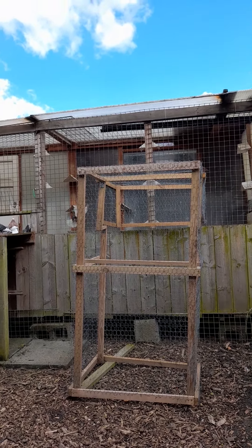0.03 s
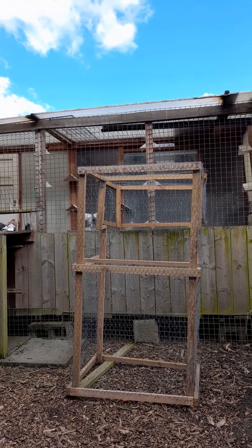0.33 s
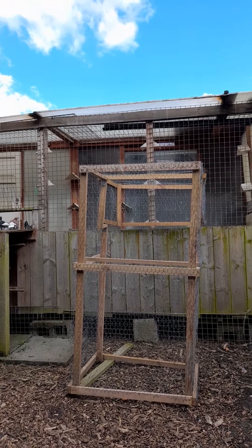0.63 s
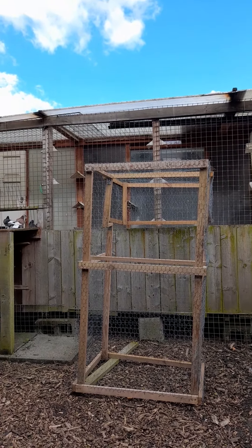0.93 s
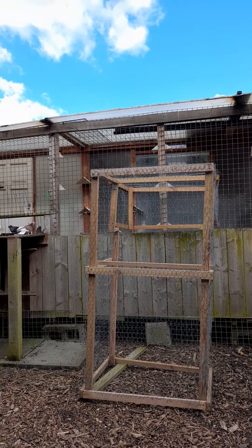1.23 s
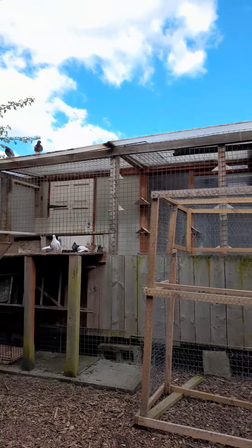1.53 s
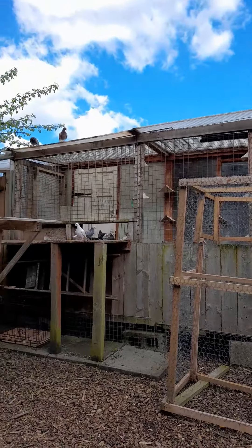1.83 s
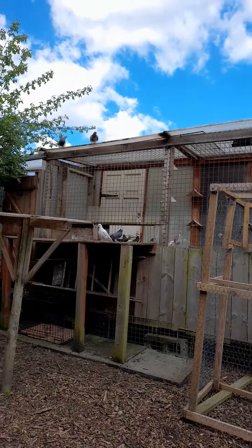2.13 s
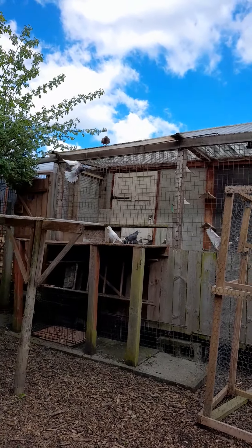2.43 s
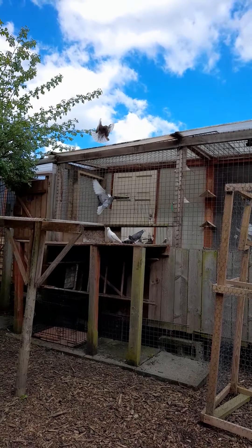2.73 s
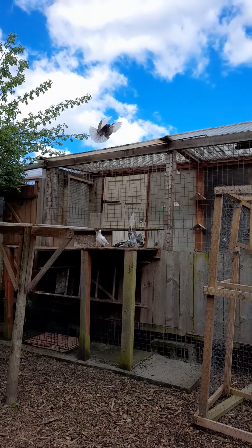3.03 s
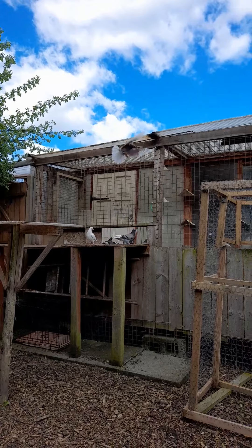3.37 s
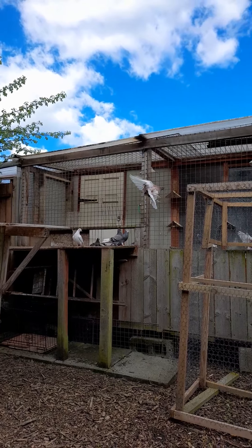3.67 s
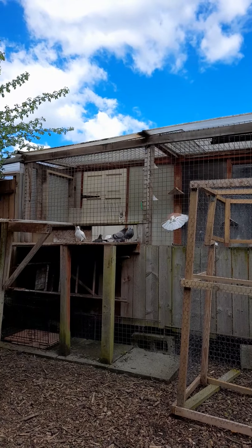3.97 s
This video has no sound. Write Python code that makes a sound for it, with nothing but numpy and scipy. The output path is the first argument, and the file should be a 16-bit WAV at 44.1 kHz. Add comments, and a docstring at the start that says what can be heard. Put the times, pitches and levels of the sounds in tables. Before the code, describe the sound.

Dry feed shaken rhythmically in a plastic tub, then faint bird chirps and pigeon wing flaps.

```python
"""Dry feed shaken ten times in a plastic tub, close to the right of the microphone, in a backyard.
On each stroke the grain slams into the wall, rings the tub, slides on and rolls back; then it settles.
Pigeons flap with whistling feathers and coo about their loft, and a small songbird twitters
in gliding whistles and rasps over the quiet outdoor air."""
import sys
import numpy as np
from scipy import signal
from scipy.fft import rfft, irfft
from scipy.io import wavfile
from scipy.ndimage import uniform_filter1d

SR = 44100
rng = np.random.default_rng(int(sys.argv[2]) if len(sys.argv) > 2 else 0)


def materialize(psi):
    """Save the field psi as 16-bit PCM at rate SR to the path in sys.argv[1].

    A 1-D psi becomes a single channel; in a 2-D psi each row is a channel.
    """
    bounded = np.clip(np.atleast_2d(psi).T, -1, 1)
    quanta = np.round(bounded * 32767).astype(np.int16)
    wavfile.write(sys.argv[1], SR, quanta)


N = 176400
T = np.arange(N) / SR
HZ = np.fft.rfftfreq(N, 1 / SR)
GRAINS_PER_S = 16000

# Strokes of the tub, relative levels:
# impact/s, rise/s, fall/s, slam/dB, thud/dB, clack/dB, slide/dB, slide length/s, thud centre/Hz
STROKES = [(.046, 0.0088, 0.022, -12, -2, -3, -23.5, 0.13, 470),
           (.289, 0.0076, 0.02, -12, -5.5, -2, -32, 0.21, 443),
           (0.552, 0.014, 0.0093, -12, 0, 2.5, -22, 0.085, 440),
           (.785, 0.011, 0.013, -13, 0.5, -1, -24.5, 0.069, 422),
           (1.034, 0.0074, 0.012, -9.5, 2.5, 2.5, -21.5, 0.13, 573),
           (1.286, 0.012, 0.01, -11, 0.5, 4.5, -21.5, 0.13, 490),
           (1.552, 0.017, 0.0054, -11.5, -0.5, 0.5, -25, 0.068, 527),
           (1.824, 0.016, 0.012, -12.5, -3.5, -1, -23.5, 0.13, 458),
           (2.095, .015, 0.013, -11.5, -4, -1.5, -28.5, 0.12, 486),
           (2.364, 0.016, 0.0025, -14, -3.5, 2, -27.5, 0.071, 420)]


def amp(db):
    """Decibels to gain."""
    return 10 ** (np.asarray(db) / 20)


def unit(x):
    """Scale to rms 1."""
    return x / np.sqrt(np.mean(x ** 2) + 1e-20)


def read(points, hz=HZ):
    """Interpolate a table over log frequency."""
    f, value = np.transpose(points)
    return np.interp(np.log(hz + 1), np.log(f + 1), value)


def swell(s, sigma_s):
    """Gaussian envelope centred on s."""
    return np.exp(-.5 * np.minimum(((T - s) / sigma_s) ** 2, 200))


def convolve(x, response):
    """Apply an impulse response."""
    return signal.fftconvolve(np.atleast_2d(x), np.atleast_2d(response), axes=1)[:, :N]


def causal(gain, size=4096):
    """Minimum-phase impulse response: no ringing before the hit."""
    log_gain = np.log(np.maximum(np.r_[gain, gain[-2:0:-1]], 1e-5))
    return np.fft.ifft(np.exp(np.conj(signal.hilbert(log_gain)))).real[:size]


def noise(spectrum_db):
    """Distant stereo noise, nearly alike on both sides in the bass."""
    # Left-right likeness: f/Hz, correlation
    likeness = [(700, 0.78), (2000, 0.076)]
    # Left-side shading: f/Hz, gain/dB
    shading = [(60, -6.5), (1000, -1.5), (15000, -4)]
    right, other = rfft(rng.standard_normal((2, N)))
    same = read(likeness)
    left = (same * right + np.sqrt(1 - same ** 2) * other) * amp(read(shading))
    return unit(irfft(np.array([left, right]) * amp(spectrum_db), N))


def yard(x):
    """Scattered echoes from fences and sheds."""
    # Echo decay: f/Hz, t60/s
    decay = [(5000, 0.32), (15000, 0.13)]
    taps = rng.standard_normal((2, SR // 2)) * (T[:SR // 2] > .006)
    hz, t, bands = signal.stft(taps, SR, nperseg=256)
    tail = signal.istft(bands * amp(-60 * t / read(decay, hz)[:, None]), SR, nperseg=256)[1]
    return convolve(x, tail / np.linalg.norm(tail[0]))


def outdoors():
    """Steady outdoor rumble and hiss; the recorder's gain comes up near the end."""
    # Air spectrum: f/Hz, relative density/dB
    spectrum = [(24, -26.5), (55, 4), (220, -10.5), (330, -6.5), (700, -7), (1100, -15), (2500, -21.5),
                (6500, -25), (8200, -35), (11500, -30), (16000, -31)]
    # Gain on the background: t/s, level/dB
    gain = [(3.5, -53.5), (3.7, -48)]
    return noise(read(spectrum)) * amp(np.interp(T, *np.transpose(gain)))


def flutter(width_hz=110):
    """Complex stereo modulator that spreads a tone into a narrow band."""
    white = rng.standard_normal((2, N)) + 1j * rng.standard_normal((2, N))
    slow = signal.lfilter(*signal.butter(2, width_hz / 2, fs=SR), white)
    return slow / slow.real.std()


def wings(air, fuzz, sigma_s=.01694, glide_per_s=1.207):
    """Each wing beat pushes air and makes the feathers whistle upward."""
    # Wing beats: t/s, whistle/Hz, level/dB
    beats = [(2.72, 1500, -57.5), (2.855, 1480, -61), (2.96, 1513, -55.5), (3.59, 1490, -55),
             (3.685, 1612, -49.5), (3.80, 1600, -52.5), (3.915, 1650, -48.5)]
    out = np.zeros((2, N))
    for s, hz, db in beats:
        near = abs(T - s) < 4 * sigma_s
        glide_hz = hz * (1 + glide_per_s * (T[near] - s))
        sub = np.exp(1j * np.pi * np.cumsum(glide_hz) / SR)  # octave below the whistle
        whistle = (fuzz[:, near] * (amp(-3) * sub + sub ** 2 + amp(-6.5) * sub ** 3)).real
        out[:, near] += swell(s, sigma_s)[near] * amp(db) * (whistle + amp(-.5) * air[:, near])
    return out


def wing_thumps(rise_s=.0026, decay_s=.019):
    """Soft low thumps of air from the wing flaps."""
    # Wing flaps: t/s, level/dB
    flaps = [(2.902, -47), (3.63, -39.5), (3.732, -43), (3.972, -44)]
    level = sum(amp(db) * np.clip((T - s) / rise_s, 0, 1) * np.exp(-abs(T - s) / decay_s)
                for s, db in flaps)
    return level * noise(read([(60, -19), (320, 28), (1200, -44)]))


def pigeons(coo_hz=665):
    """Wing beats and their low thumps, feather rustles and faint coos."""
    # Air moved by feathers: f/Hz, relative density/dB
    air_spectrum = [(60, -5.5), (300, 19.5), (1900, 5.5), (7000, 5.5), (8200, -15), (12000, 0)]
    # Feather rustles on landing: t/s, sigma/s, level/dB
    rustles = [(3.171, 0.033, -54.5), (3.34, 0.086, -57)]
    # Coos: t/s, sigma/s, level/dB
    coos = [(3.149, 0.012, -48.5), (3.866, .03, -52)]
    air, fuzz = noise(read(air_spectrum)), flutter()
    rustle = sum(amp(db) * swell(s, w) for s, w, db in rustles) * np.sqrt(spurts()) * air
    voice = ((1 + .5 * fuzz[0]) * np.exp(2j * np.pi * coo_hz * T)).real
    coo = sum(amp(db) * swell(s, w) for s, w, db in coos) * voice
    return wings(air, fuzz) + rustle + coo + wing_thumps()


def rasp(s, sigma_s, hz, db, warble_hz=141.3, depth=.083, log_width=.19):
    """Harsh note: the pitch warbles fast and unevenly inside a band of hiss."""
    warble = unit(signal.lfilter(*signal.butter(2, warble_hz, fs=SR), rng.standard_normal(N)))
    tone = np.sqrt(2) * np.sin(2 * np.pi * np.cumsum(hz * (1 + depth * warble)) / SR)
    hiss = noise(-10 * np.log10(1 + (np.log((HZ + 1) / hz) / log_width) ** 6))
    return amp(db) * swell(s, sigma_s) * unit(tone + amp(1) * hiss)


def songbird(bend=2.9, overtone_db=-22.5):
    """Quick gliding whistles and a few rasps, echoing round the yard."""
    # Whistles: t/s, length/s, start/Hz, end/Hz, relative level/dB
    notes = [(2.894, 0.023, 3320, 4180, -51), (2.988, 0.02, 3190, 3600, -59),
             (3.038, 0.026, 4970, 5420, -49), (3.058, 0.017, 3810, 4340, -52),
             (3.092, 0.0086, 4660, 6230, -45), (3.111, 0.027, 5870, 5790, -45.5),
             (3.145, 0.024, 5240, 5140, -43), (3.183, 0.016, 3000, 4170, -47.5),
             (3.203, 0.032, 3944, 4160, -47.5), (3.267, 0.02, 4400, 5060, -47),
             (3.356, 0.036, 5700, 5870, -43.5), (3.41, 0.067, 4180, 2770, -60),
             (3.53, 0.02, 3790, 5330, -50.5), (3.582, 0.056, 6000, 6110, -46.5),
             (3.666, 0.095, 5290, 4550, -46.5), (3.849, 0.018, 3840, 5040, -44.5),
             (3.87, 0.017, 3900, 5050, -40), (3.918, 0.025, 6000, 6300, -38.5)]
    # Raspy notes: t/s, sigma/s, centre/Hz, relative level/dB
    rasps = [(3.343, 0.02, 6180, -54), (3.402, 0.014, 3860, -50), (3.721, 0.02, 3950, -41),
             (3.917, 0.098, 4130, -52.5)]
    song = np.zeros(N)
    for s, length_s, from_hz, to_hz, db in notes:
        u = np.arange(0, length_s, 1 / SR) / length_s
        waver = unit(uniform_filter1d(rng.standard_normal(N // 10), size=60))[:len(u)]
        hz = (to_hz + (from_hz - to_hz) * abs(1 - u) ** bend) * (1 + .008 * waver)
        phase = 2 * np.pi * np.cumsum(hz) / SR
        tone = np.sin(phase) + amp(overtone_db) * np.sin(2 * phase)
        level = amp(db) * np.sin(np.pi * u) * (1 + waver[::-1] / np.pi)
        part = song[round(s * SR):][:len(u)]
        part += (level * tone)[:len(part)]
    direct = song * amp([[-3.5], [.5]]) + amp(-2) * sum(rasp(*row) for row in rasps)
    return direct + amp(-3.5) * yard(direct)


def spurts(per_s=380, share=.58, decay_s=.0005):
    """Contacts come in tight clusters: a power factor of mean 1."""
    hits = (rng.random(N) < per_s / SR) * rng.uniform(.2, 1, N)
    burst = signal.lfilter([1], [1, -np.exp(-1 / (decay_s * SR))], hits)
    return 1 - share + share * burst / burst.mean()


def grains(power, per_s=GRAINS_PER_S, spread_db=-2.5):
    """Random impacts of uneven size whose mean power follows a curve."""
    size = unit(amp(spread_db * np.minimum(rng.exponential(1, N), 4)))
    clicks = size * rng.choice([-1, 1], N) * (rng.random(N) < per_s / SR) * np.sqrt(SR / (per_s + 1))
    local_rms = np.sqrt(abs(uniform_filter1d(clicks ** 2, size=500)) + .13)
    return clicks / local_rms * np.sqrt(power)


def stroke_powers(sag_db_per_s=17, stop_s=.013, roll_lead_s=.061, thud_lead_s=.007):
    """Power of the grain's slam, slide and roll back, and of the wall's thud and clack."""
    powers = np.zeros((5, N))
    for s, rise_s, fall_s, db, thud_db, clack_db, slide_db, slide_s, _ in STROKES:
        age = np.maximum(T - s, 0)
        slam = amp(db) ** 2 * np.where(T < s, swell(s, rise_s) ** 2, np.exp(-age / fall_s))
        sliding = (T > s) * (.5 - .5 * np.tanh((age - slide_s) / stop_s))
        slide = sliding * amp(slide_db - sag_db_per_s * age) ** 2
        roll = swell(s - roll_lead_s, sigma_s=.037) ** 2
        early_slam = np.interp(T + thud_lead_s, T, slam)
        thud = amp(thud_db) ** 2 * early_slam + amp(-6) ** 2 * slide + amp(-24) ** 2 * roll
        clack = amp(clack_db) ** 2 * slam + amp(-2) ** 2 * slide + amp(-30.5) ** 2 * roll
        powers += [slam, slide, amp(-24.5) ** 2 * roll, thud, clack]
    return powers


def seeds(slam, slide, roll, tick_s=.0013, roll_top_hz=7800):
    """Packed slam, loose crackle and single ticks; rolling seeds touch softly and sound duller."""
    # Late clumps dropping back: t/s, sigma/s, relative level/dB
    clumps = [(0.166, 0.0071, -21), (0.679, 0.011, -27.5), (1.407, 0.017, -23), (1.682, 0.021, -24.5),
              (1.927, 0.025, -19.5), (2.214, 0.021, -26), (2.523, 0.054, -44)]
    # Single seeds striking the wall: t/s, relative level/dB
    strikes = [(.4265, -16.5), (.4335, -15), (0.898, -23), (0.922, -28), (1.164, -14.5), (1.662, -24),
               (2.239, -14.5), (2.475, -25.5), (2.503, -28), (2.640, -36.5)]
    loose = slide + sum((amp(db) * swell(s, w)) ** 2 for s, w, db in clumps)
    ticks = sum(amp(db) ** 2 * (T >= s) * np.exp(-abs(T - s) / tick_s) for s, db in strikes)
    hard = grains(slam * spurts(per_s=420, share=.42) + loose * spurts() + ticks)
    return hard + signal.lfilter(*signal.butter(2, roll_top_hz, fs=SR), grains(roll))


def tub_echoes(x, spots=12, t60_s=.035):
    """Short reflections in the tub, different for each spot where a seed lands."""
    t, spot, out = T[:SR // 30], rng.integers(0, spots, N), 0
    for k in range(spots):
        echo = rng.standard_normal((2, len(t))) * amp(-60 * t / t60_s)
        out = out + convolve(x * (spot == k), echo / np.linalg.norm(echo, axis=1)[:, None])
    return signal.sosfilt(signal.butter(1, 3000, "high", fs=SR, output="sos"), out)


def wall_spot(x, width_hz=380, cut_hz=338):
    """The landing spot favours one low band; the small tub radiates little below cut_hz."""
    centre_hz = np.interp(T, [row[0] for row in STROKES], [row[-1] for row in STROKES])
    carrier = np.exp(2j * np.pi * np.cumsum(centre_hz) / SR)
    pole = np.exp(-np.pi * width_hz / SR)
    band = 2 * (carrier * signal.lfilter([1 - pole], [1, -pole], x / carrier)).real
    return signal.sosfilt(signal.butter(3, cut_hz, "high", fs=SR, output="sos"), band)


def ringing(modes):
    """Impulse response of damped wall modes, alternating in sign."""
    t = T[:SR // 10]
    return sum(amp(db) * width * np.exp(-np.pi * width * t) * np.sin(2 * np.pi * hz * t) * (-1) ** k
               for k, (hz, width, db) in enumerate(modes))


def far_port(x, delay_s=.00044):
    """The left microphone port is farther from the tub: shaded and late."""
    # Shading: f/Hz, gain/dB
    shading = [(400, -8), (1300, -3.5), (2400, -7.5), (4400, -12), (15000, -18.5)]
    return convolve(np.roll(x, round(delay_s * SR)), causal(amp(read(shading))))[0]


def shaken_tub(crowding=.75):
    """Grain ticks against grain and rings the tub; wall impacts crowd as the level rises."""
    # Grain rattle spectrum: f/Hz, relative gain/dB
    rattle_spectrum = [(60, -33), (400, -24.5), (1050, -4.5), (1500, -10.5), (2200, 1.7), (3300, -0.5),
                       (4400, 2.5), (7100, 4), (8100, -7.5), (9500, -1), (12000, 4), (14000, 5.5),
                       (16000, -4.5)]
    # Low tub modes: f/Hz, width/Hz, relative level/dB
    thud_modes = [(335, 74, -3), (406.6, 60, -3), (515.5, 27.3, -1), (617, 61, -3.5), (913, 130, -3.5)]
    # High tub modes: f/Hz, width/Hz, relative level/dB
    clack_modes = [(1268, 225, 2.1), (1465, 186, 4.5), (2094, 276, 0.82)]
    slam, slide, roll, *wall = stroke_powers()
    thud, clack = (grains(power, GRAINS_PER_S * np.sqrt(power) ** crowding) for power in wall)
    rattle = seeds(slam, slide, roll)
    rattle = rattle + amp([[-2.5], [-4]]) * tub_echoes(rattle)
    parts = [(rattle, causal(amp(read(rattle_spectrum))), -3),
             (wall_spot(thud), ringing(thud_modes), -14.5),
             (clack, ringing(clack_modes), -16)]
    left, right = sum(amp(db) * convolve(x, body / np.linalg.norm(body)) for x, body, db in parts)
    echoes = yard(signal.lfilter(*signal.butter(1, 6000, fs=SR), right))
    return np.array([far_port(left), right]) + amp(-19) * echoes


def scene():
    """Stereo sum of all sources."""
    return shaken_tub() + songbird() + pigeons() + outdoors()


def record(dry, edge_hz=16100):
    """Limit to full scale, then low-pass."""
    lowpass = signal.firwin(511, edge_hz, window=("kaiser", 9), fs=SR)
    return signal.oaconvolve(np.clip(dry, -1, 1), lowpass[None], "same")


dry = scene()
out = record(dry)
materialize(out)
```